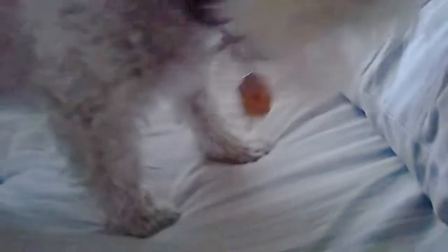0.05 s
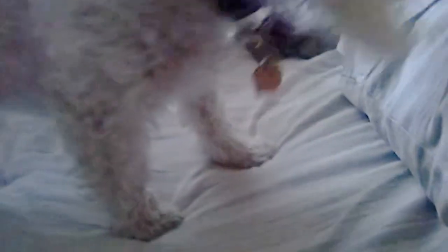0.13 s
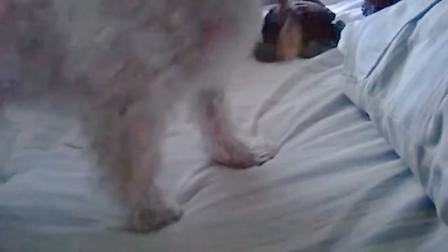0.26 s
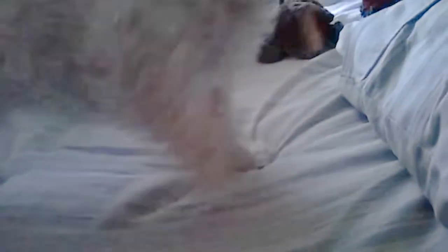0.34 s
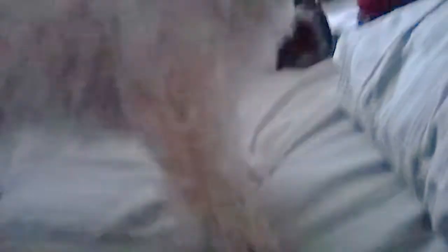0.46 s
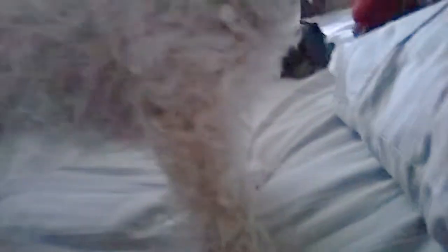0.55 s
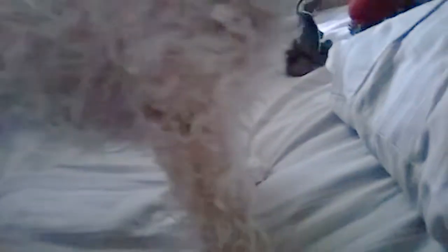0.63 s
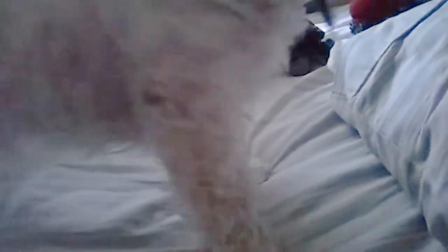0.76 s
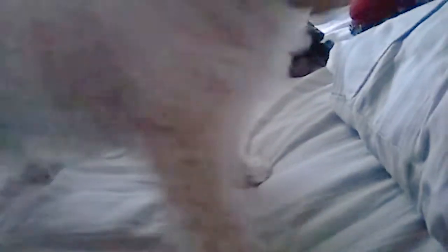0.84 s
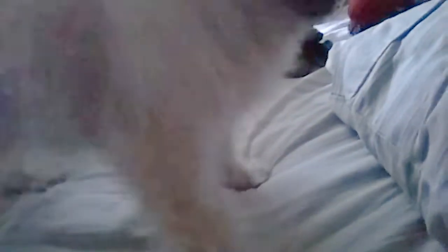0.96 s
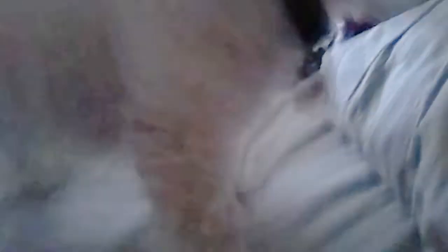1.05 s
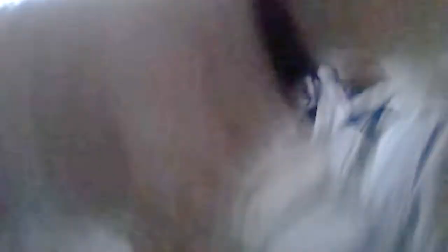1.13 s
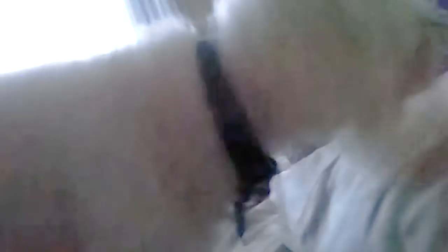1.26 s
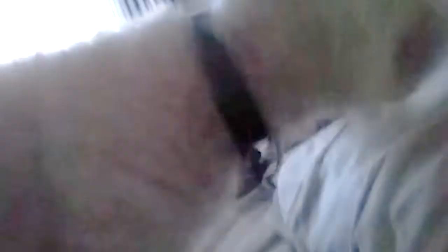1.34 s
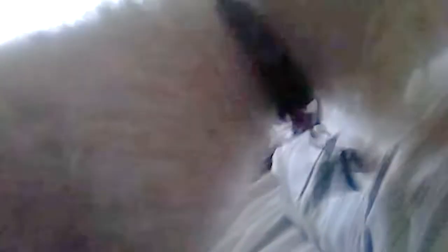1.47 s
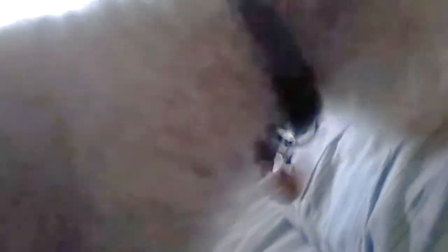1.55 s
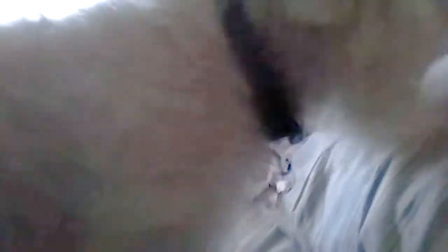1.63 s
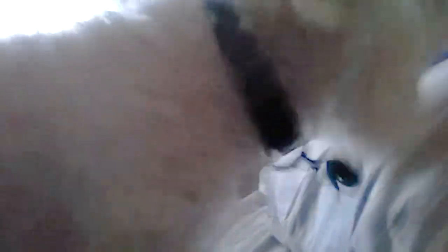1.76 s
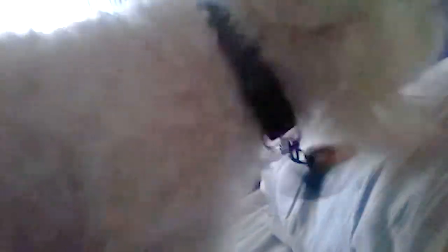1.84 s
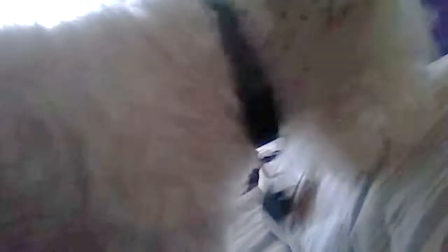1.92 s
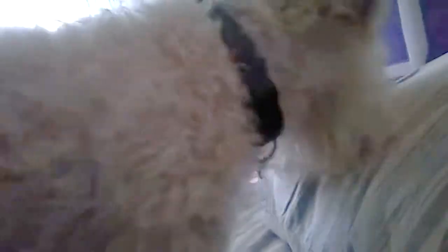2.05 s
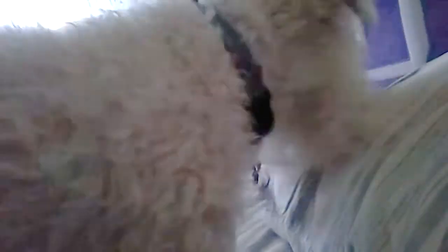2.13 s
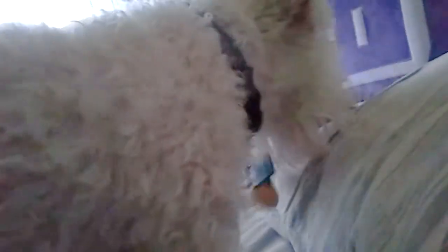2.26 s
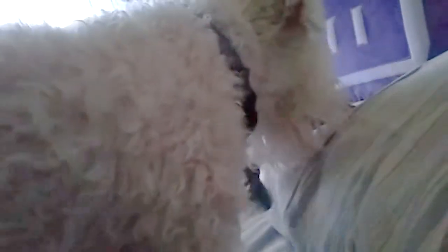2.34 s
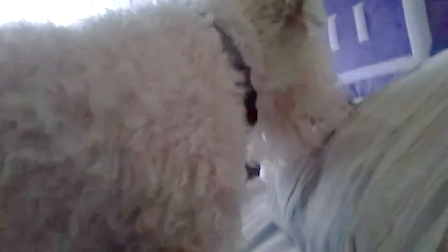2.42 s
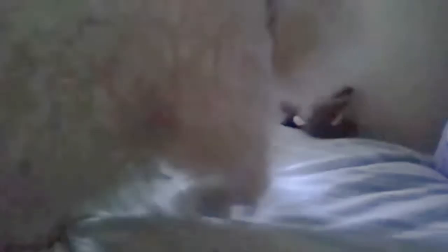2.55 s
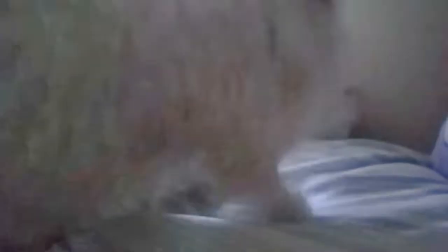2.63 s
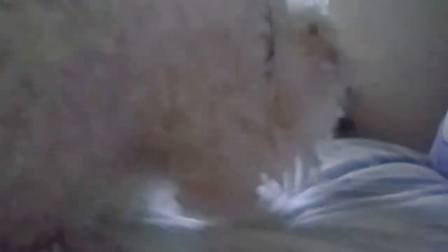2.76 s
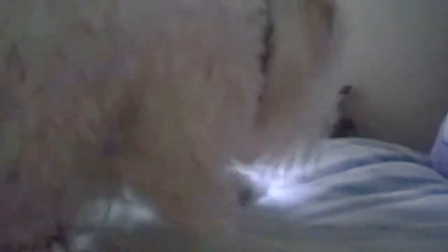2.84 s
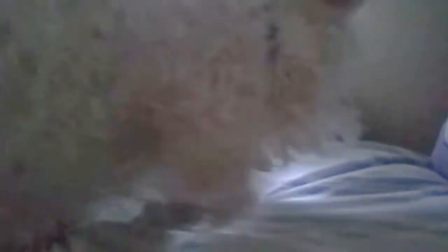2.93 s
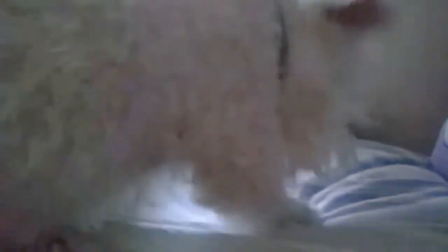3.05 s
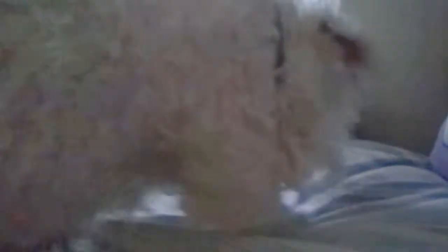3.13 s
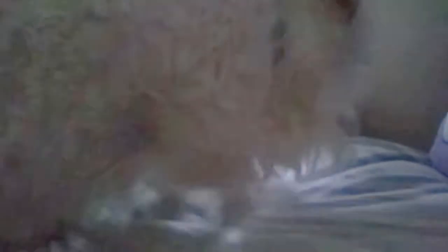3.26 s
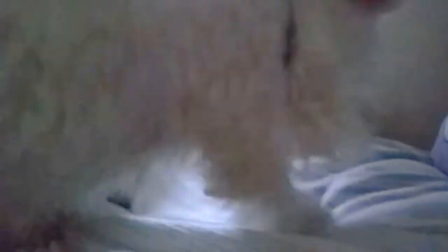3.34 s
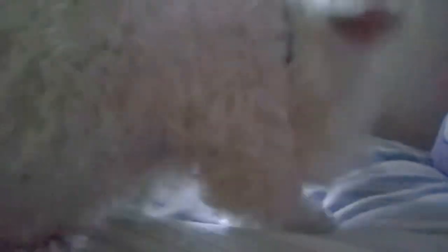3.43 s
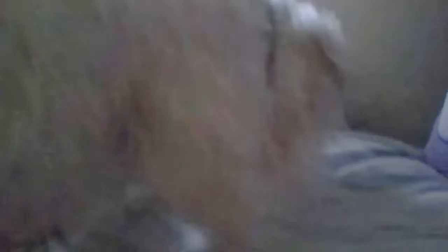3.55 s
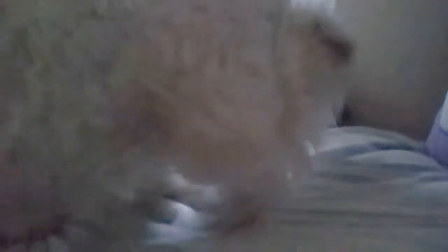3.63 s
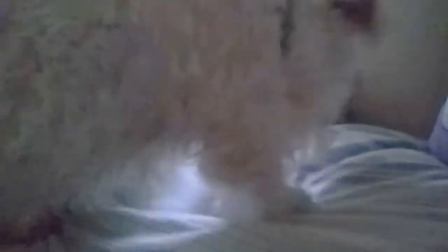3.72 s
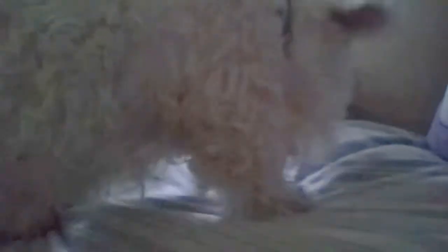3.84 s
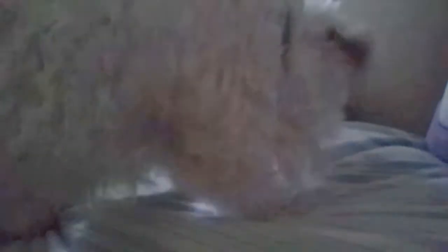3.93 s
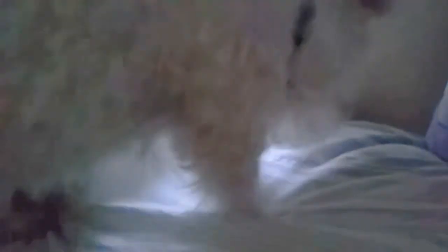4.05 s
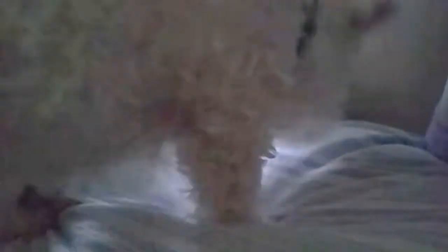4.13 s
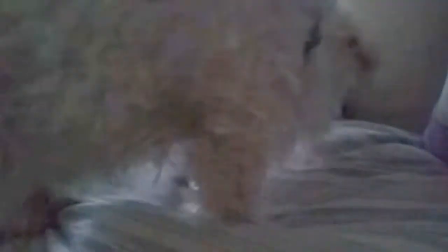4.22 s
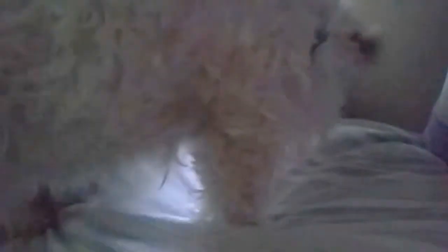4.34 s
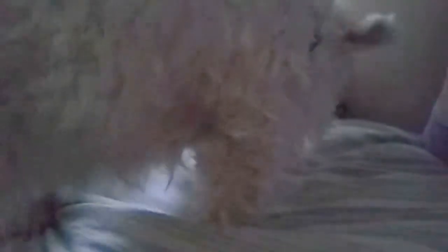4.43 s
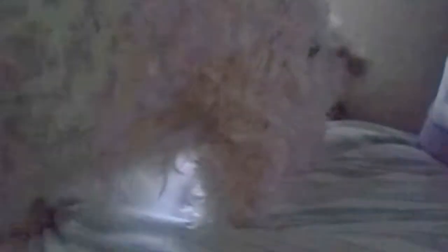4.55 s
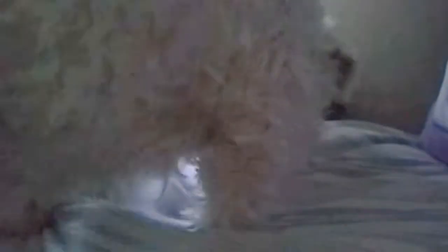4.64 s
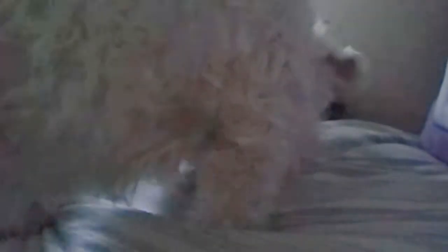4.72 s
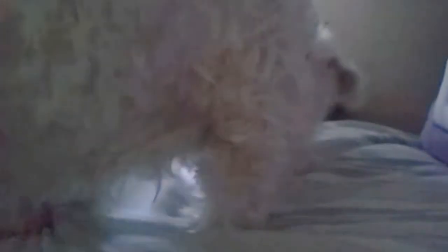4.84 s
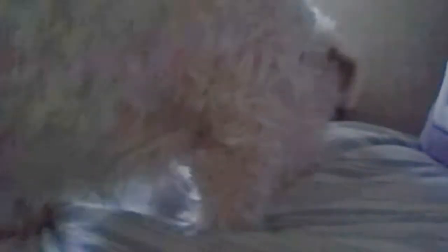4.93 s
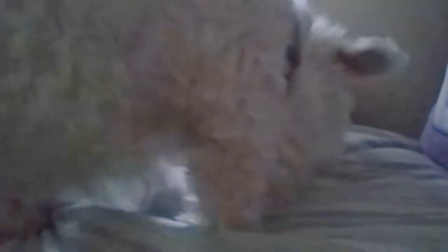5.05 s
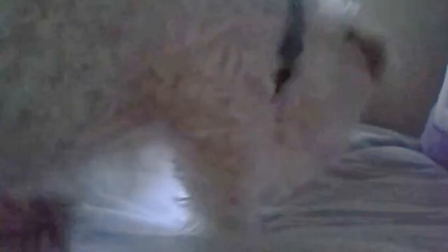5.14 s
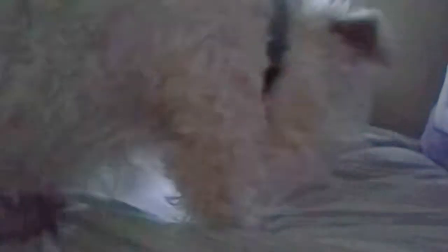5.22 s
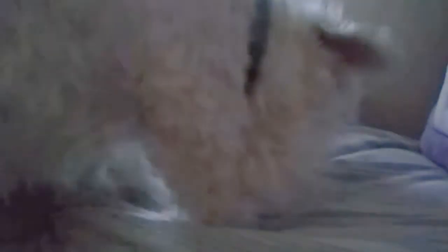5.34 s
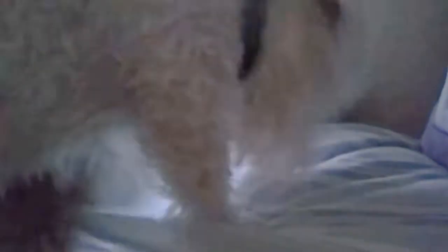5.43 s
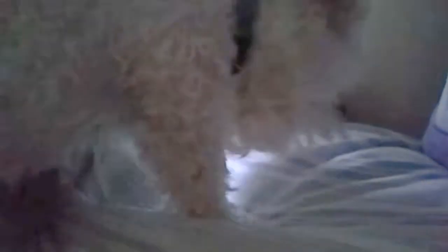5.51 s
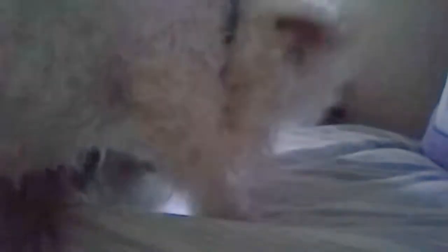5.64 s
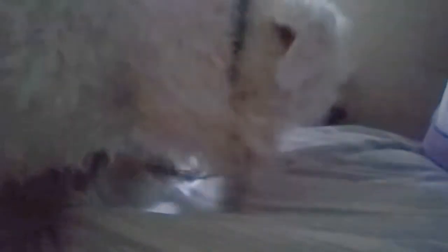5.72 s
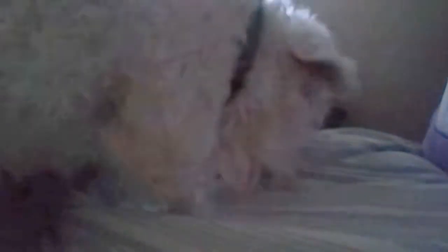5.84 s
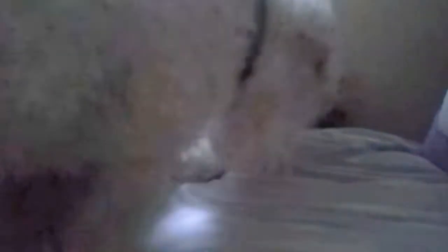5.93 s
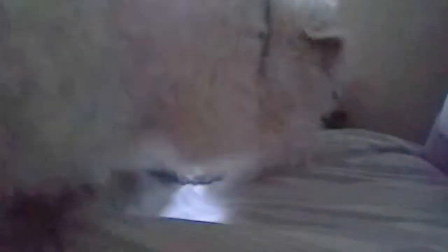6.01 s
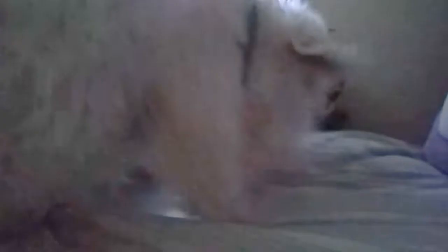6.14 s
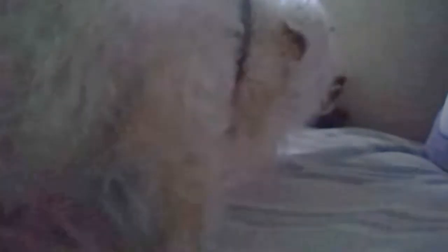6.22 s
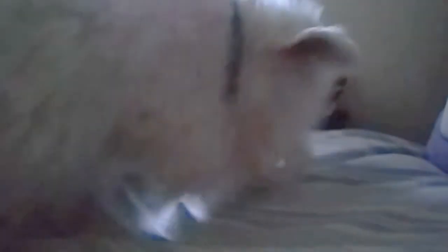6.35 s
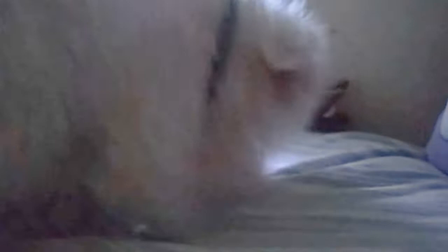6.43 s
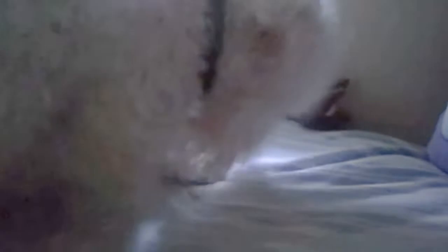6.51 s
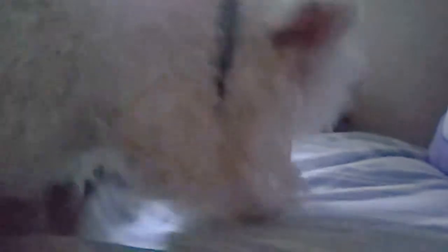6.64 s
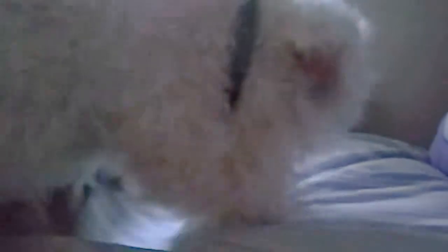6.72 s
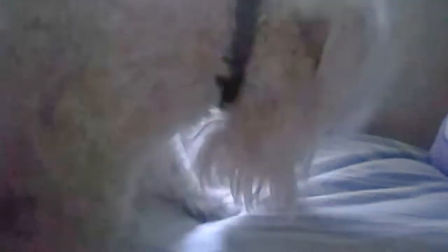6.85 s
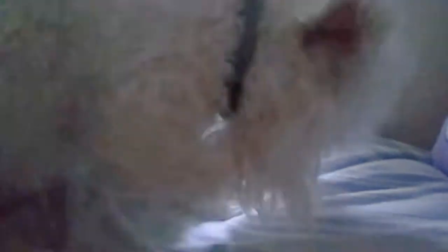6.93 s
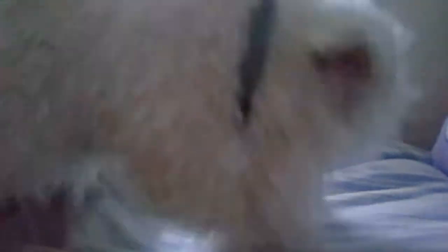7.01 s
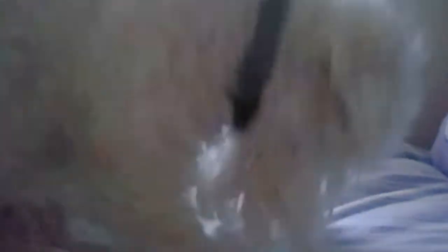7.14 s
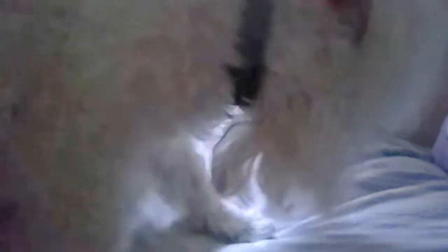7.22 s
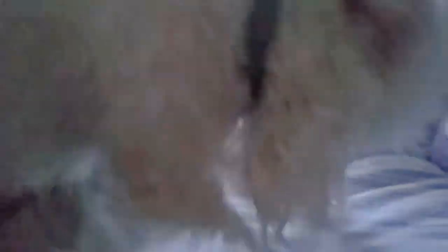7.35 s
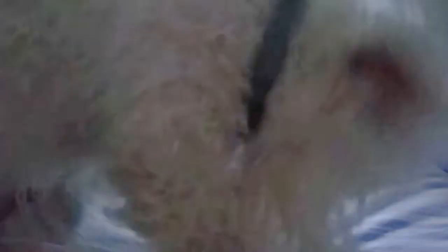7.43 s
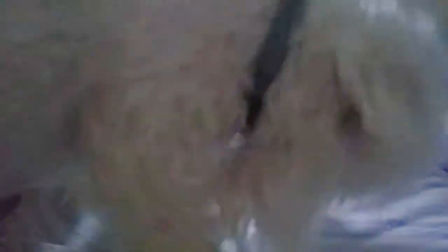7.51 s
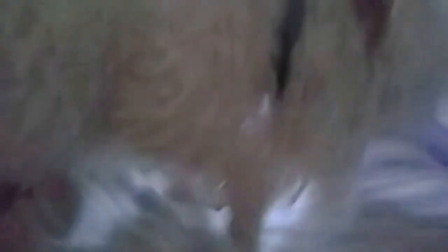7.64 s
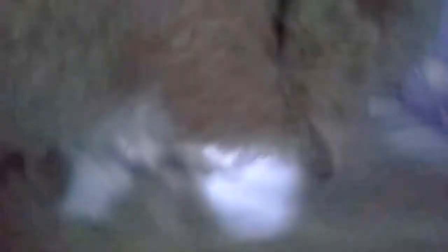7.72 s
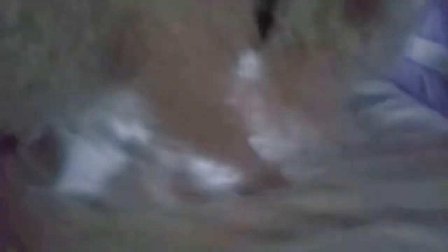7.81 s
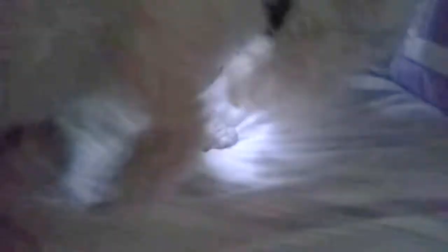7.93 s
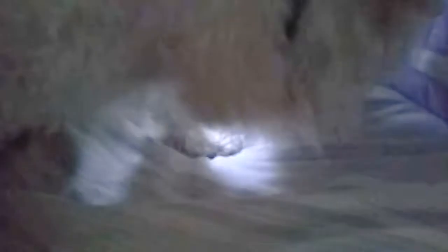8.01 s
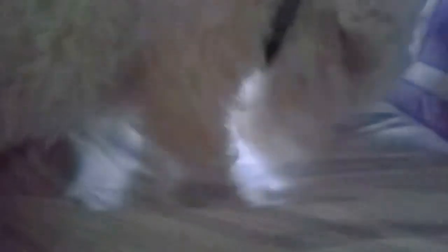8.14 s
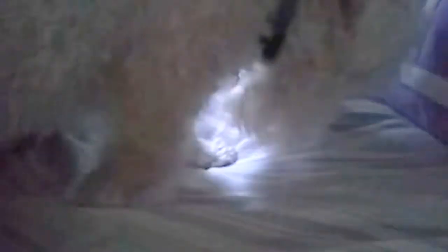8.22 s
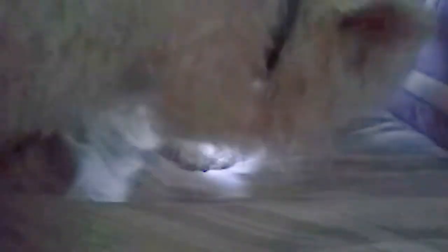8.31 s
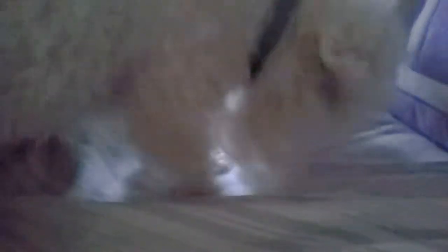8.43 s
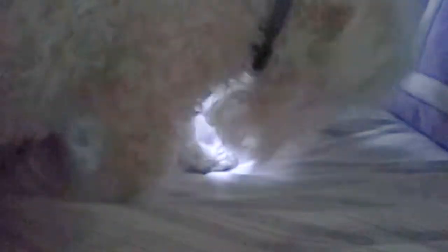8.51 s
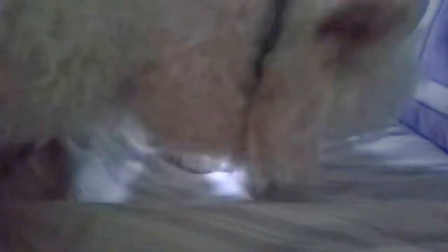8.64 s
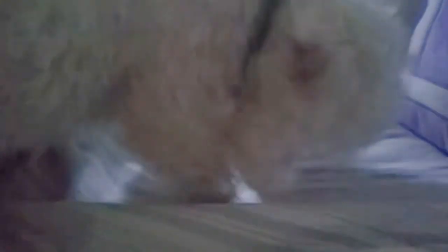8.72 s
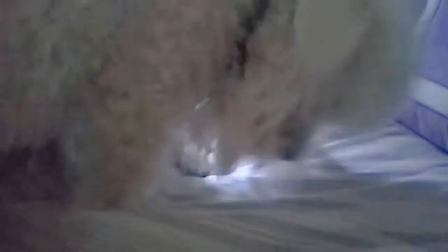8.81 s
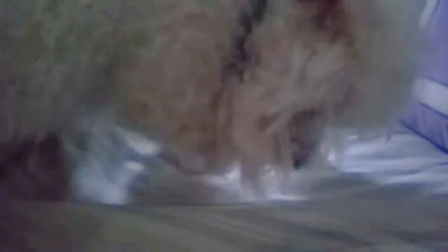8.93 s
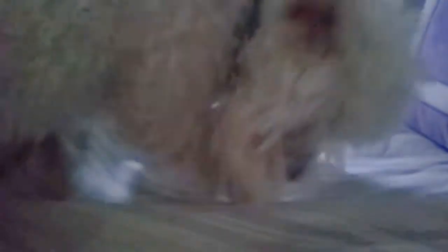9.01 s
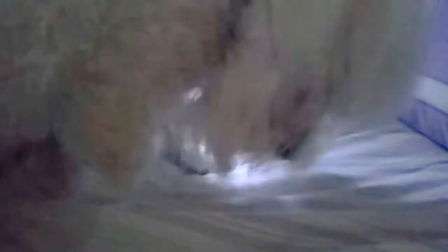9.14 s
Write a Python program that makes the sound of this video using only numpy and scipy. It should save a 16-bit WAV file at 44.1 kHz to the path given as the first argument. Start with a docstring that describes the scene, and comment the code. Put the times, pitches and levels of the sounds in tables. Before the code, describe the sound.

Indoors on a bed, very close to the microphone, a small curly-haired dog shakes its neck: a dense, bright jingle of metal tags with buckle knocks and rustling fur, thinning out by two seconds. Then it digs at the sheet in separate short scratches, three or four a second, each a dry cloth rasp with claw snags, a fine hiss and a dull mattress thump. Low bed rumble and faint hiss lie underneath.

```python
"""A small dog on a bed, close to the microphone, over a quiet hiss and the low rumble of the swaying bed.
First it shakes its neck: fur rustles, the collar buckle knocks, and metal tags ring as decaying sine pairs.
From about 2.5 s it digs at the sheet, some five strokes a second: claws rasp as noise in the resonances of
the taut cloth, snag it as damped tones and zip over the weave as rising tones; fur and fabric hiss as
shaped noise, and each stroke thumps the mattress with short low tones."""
import sys
import numpy as np
from scipy.fft import rfft, irfft, next_fast_len
from scipy.io import wavfile
from scipy.ndimage import uniform_filter1d, map_coordinates

SR = 44100
rng = np.random.default_rng(int(sys.argv[2]) if len(sys.argv) > 2 else 0)


def file_out(sig):
    """Save sig as 16-bit WAV at sys.argv[1]."""
    # one column per channel
    cols = np.atleast_2d(sig).T
    # limit, then scale
    lim = np.clip(cols, -1, 1)
    pcm = np.round(lim * 32767).astype(np.int16)
    wavfile.write(sys.argv[1], SR, pcm)


N = 404397

# Spectra of the noises: (frequency [Hz], relative density [dB per Hz])
FLOOR_SPECTRUM = [(41, -29.5), (70, -4.5), (155, -7), (307, -15.5), (853, -25), (1850, -26.5), (1980, -28),
                  (5500, -28.5), (11400, -22.5), (16000, -35)]
SWAY_SPECTRUM = [(8, -18), (16, -3), (28, 0), (45, -3), (70, -22)]
MATTRESS_SPECTRUM = [(35, -30.5), (55, 4), (80, 0.5), (130, -2), (180, -8), (260, -14.5), (400, -27)]
RUSTLE_SPECTRUM = [(150, -10), (350, 4.5), (700, -4), (1500, -12.5), (2500, -11), (3200, -9), (5000, -8.5),
                   (7000, -28)]
CRACK_SPECTRUM = [(800, -42), (3000, -31), (5000, -21.5), (8000, -10), (10000, -3), (12000, 3), (14000, 2),
                  (16500, -8.5)]
HISS_SPECTRUM = [(2240, -6), (3800, -11), (6150, -11.5), (8560, -10), (10300, -8.5), (11000, -2),
                 (12100, 0.5), (15000, -10.5), (16000, -10.5)]
# Sway of the bed: (time [s], level [dB])
BED_SWAY = [(0.0, -47), (0.07, -37), (0.3, -50), (0.92, -32), (1.66, -34), (1.81, -48.5), (2.4, -55),
            (2.55, -28), (3.98, -32.5), (4.52, -37), (4.54, -30.5), (6.0, -34), (6.05, -43.5),
            (6.31, -22.5), (6.33, -30.5), (7.12, -32.5), (7.3, -36.5), (8.91, -36), (8.96, -30.5),
            (9.17, -34.5)]
# Neck shake: (time [s], loose rattle of the tag rings [dB], mattress [dB])
SHAKE = [(0.0, -84, -79), (0.2, -68, -59), (0.3, -77, -81), (0.47, -67.5, -69), (0.57, -52, -45),
         (0.68, -52.5, -57), (0.79, -55.5, -52), (0.97, -42, -47), (1.08, -45.5, -36), (1.17, -59, -54),
         (1.49, -54, -45.5), (1.67, -57.5, -56), (1.83, -76, -76), (2.1, -87, -62.5), (2.47, -79, -61)]
# Clear knocks of the collar buckle: (time [s], level [dB], pitch [Hz])
KNOCKS = [(0.612, -45, 1530), (0.682, -42.5, 1660), (0.754, -37.5, 490), (0.827, -42, 791),
          (0.887, -30.5, 3010), (0.896, -24, 600), (0.965, -30.5, 527), (1.003, -39.5, 2280),
          (1.027, -34, 501), (1.061, -43, 615), (1.075, -44, 1500), (1.107, -39, 1100), (1.089, -35, 800),
          (1.132, -26.5, 1176), (1.641, -55, 1400), (2.134, -57.5, 1423)]
# Clear tag contacts: (time [s], crack [dB], low tag [dB], middle tag [dB], high tag [dB])
TAG_CONTACTS = [(0.4986, -43, -54, -39, -48), (0.541, -43, -61, -34, -34), (0.5503, -43, -41, -27, -37),
                (0.5696, -27, -29, -29, -27), (0.5777, -38, -44, -35, -24), (0.5883, -18, -49, -28, -35),
                (0.5951, -24, -50, -29, -25), (0.6115, -33, -43, -29, -32), (0.6286, -40, -47, -24, -28),
                (0.6422, -42, -38, -18, -24), (0.6657, -27, -57, -28, -37), (0.6898, -32, -65, -22, -26),
                (0.6956, -29, -49, -29, -35), (0.7071, -33, -45, -22, -28), (0.7236, -24, -29, -29, -29),
                (0.7377, -34, -40, -24, -28), (0.7515, -22, -40, -18, -22), (0.786, -31, -51, -29, -22),
                (0.796, -25, -44, -28, -19), (0.8198, -24, -54, -29, -33), (0.8405, -27, -42, -31, -30),
                (0.8627, -25, -52, -27, -19), (0.871, -36, -48, -21, -34), (0.8887, -28, -49, -32, -33),
                (0.8975, -33, -52, -33, -37), (0.9344, -20, -42, -36, -29), (0.9466, -20, -43, -39, -34),
                (0.9525, -28, -52, -32, -38), (0.971, -32, -51, -32, -22), (1.0073, -23, -42, -22, -32),
                (1.0167, -26, -42, -43, -43), (1.0211, -19, -30.5, -20, -33), (1.0277, -27, -39, -19, -26),
                (1.0453, -32, -46, -26, -28), (1.0744, -32, -48, -35, -37), (1.0879, -36, -50, -16, -31),
                (1.1128, -20, -61, -35, -38), (1.1324, -19, -49, -9, -29), (1.1661, -43, -52, -34, -36),
                (1.1971, -35, -59, -41, -49), (1.2277, -35, -49, -21, -36), (1.2694, -35.5, -49, -38, -39),
                (1.3192, -35, -61, -49, -44), (1.3302, -29, -61, -33, -37), (1.3472, -31, -43, -31.5, -27),
                (1.3661, -43, -53, -34, -33.5), (1.3707, -26, -49, -37, -40), (1.4046, -34, -50, -34, -30),
                (1.4425, -39, -67, -34, -47), (1.4539, -30, -50, -35, -27), (1.4958, -39, -64, -38, -38),
                (1.5367, -36, -34, -22, -20), (1.5527, -26, -46, -28, -25), (1.6006, -38, -61, -48, -30),
                (1.6373, -25, -62, -43, -43), (1.642, -28, -31, -37, -19), (1.663, -38, -42, -39.5, -30),
                (1.6987, -44, -62, -38, -38), (1.7229, -30, -61, -31, -34), (1.8378, -40, -48, -42, -36),
                (1.8513, -41, -53, -49, -42), (1.8578, -36, -54, -37, -36), (1.8745, -49, -62, -39, -43),
                (1.932, -48, -64, -51, -40), (1.9888, -55, -74, -72, -65), (2.1004, -49, -61, -53, -46),
                (2.1349, -53, -61, -55, -42.5), (2.3441, -32, -66, -38, -39), (2.4949, -47, -66, -47, -46),
                (6.8993, -37.5, -66, -45, -44)]
# Modes of the low, middle and high tag, one list each:
# (frequency [Hz], level [dB], twin frequency [Hz], least twin level [dB], decay by 60 dB [s])
TAG_MODES = [
    [(6350, 0, 6050, -9, 0.06)],
    [(11866, -0.5, 11760, -18, 0.1), (7080, -34, 6720, 2, 0.45)],
    [(14760, -1.2, 14770, 4.5, 0.061)],
]
# Dry ticks of the collar rings during the digging: (time [s], level [dB])
RING_TICKS = [(6.6204, -31), (6.7107, -31), (6.727, -45), (7.07, -36), (7.0828, -42), (8.095, -45)]
# Digging strokes: (start [s], length [s], lower rasp [dB], hiss [dB], upper rasp against lower [dB],
# swell over the stroke [dB], landing thump [dB], push-off after the start [ms], push-off thump [dB],
# push-off pitch [Hz])
STROKES = [(2.483, 0.008, -52.5, -54.5, -13, -2, -51, 5.6, -31.5, 87.5),
           (2.52, 0.11, -42, -45.5, 0, 5, -26.5, 106, -26, 116),
           (2.697, 0.077, -46.5, -48, 3, -0.5, -27, 82, -29.5, 100.5),
           (2.9, 0.077, -43, -46.5, 0.5, 5.5, -27, 112, -24.5, 75),
           (3.025, 0.057, -47.5, -47.5, 6, -0.5, -26.5, 33, -31, 117),
           (3.269, 0.067, -40.5, -47, 4, 5, -25, 67, -22, 98),
           (3.4, 0.11, -47.5, -49.5, 3.5, 2.5, -31, 108, -26, 97),
           (3.753, 0.057, -44, -44, 4, -1, -27, 23, -27.5, 109),
           (4.039, 0.034, -40, -45.5, 2.5, 3, -24, 19.2, -15.5, 105.3),
           (4.305, 0.028, -37, -43.5, 2.5, 8, -28, 33, -20, 108.5),
           (4.571, 0.053, -42, -47.5, 3, 4.5, -21, 42, -30, 80),
           (4.841, 0.078, -39, -44.5, 3.5, 3.5, -22.5, 77, -19.5, 111),
           (5.114, 0.088, -44.5, -48.5, 4.5, 6.5, -26.5, 97, -26, 96),
           (5.375, 0.017, -73, -64, -10, -10, -47, 9.3, -28.5, 77),
           (5.628, 0.081, -42, -44, 3, 3, -32, 82, -21.5, 68),
           (5.9, 0.094, -44, -45.5, 3, 5.5, -27.5, 98, -26, 116),
           (6.193, 0.096, -41, -44, 4, 5.5, -37, 84, -17, 76.5),
           (6.42, 0.1, -51, -51.5, 3, 2, -31.5, 70, -32, 71.6),
           (6.575, 0.083, -42, -43, 4, 6, -55, 86, -13.5, 83),
           (6.802, 0.027, -52.5, -55, 2.5, 1, -40, 40, -33, 69.5),
           (6.937, 0.096, -38, -43, 0.5, 5.5, -47, 90, -18, 91.9),
           (7.127, 0.066, -47, -48.5, 4.5, -2, -41, 39, -22.5, 92.5),
           (7.291, 0.072, -45, -47.5, -0.5, 5, -34, 79, -29, 137.5),
           (7.651, 0.068, -38.5, -43.5, 1, 1, -28.5, 80, -24, 75.5),
           (7.863, 0.0064, -58.5, -59, 1, 2.5, -44, 12, -42, 149),
           (7.944, 0.089, -38.5, -45, 0.5, 3.5, -35, 108, -24, 91),
           (8.176, 0.0065, -56.5, -62, 0, -5, -47, 2, -50, 74.6),
           (8.231, 0.099, -43, -46, 3.5, 5, -34, 119, -21.5, 77.4),
           (8.445, 0.021, -55, -60, -2, 4, -48, 41, -41, 56.4),
           (8.57, 0.061, -39, -46, -1, 1.5, -30, 75, -23, 93),
           (8.76, 0.012, -57, -63, -9, 3, -53, 16, -45, 76),
           (8.855, 0.087, -41.5, -48, 0, 4.5, -39, 98, -25.5, 124),
           (9.097, 0.064, -61, -60, -6, 0, -42, 41, -40, 73)]
# Claw snags: (time [s], level [dB], pitch [Hz])
SNAGS = [(2.485, -50, 750), (2.535, -25.5, 1910), (2.971, -30, 690), (3.291, -25.5, 840),
         (3.327, -28.5, 670), (3.773, -29, 850), (4.047, -21, 844), (4.294, -37, 2080), (4.321, -20.5, 634),
         (4.58, -27, 640), (5.629, -27, 2040), (5.709, -32, 1200), (6.658, -17, 1920), (7.063, -35, 1750),
         (7.664, -29, 1560), (7.715, -27, 2260), (7.862, -47, 864), (7.973, -23.5, 880), (8.166, -43, 2070),
         (8.446, -52, 800), (8.571, -21.5, 794), (8.583, -17, 1920), (8.754, -43, 1900), (8.837, -37, 1550),
         (8.925, -18, 1890), (8.932, -16.5, 2040)]
# Resonances of the taut cloth: (centre [Hz], width of one filter pass [Hz], level [dB])
SHEET_MODES = [(472, 360, -3), (780, 515, -4.5), (1456, 580, -7), (1975, 570, -3.5), (2480, 1270, -15.5),
               (3230, 790, -11)]
# A claw zips over the weave, faster and faster: (time [s], length [s], first pitch [Hz], last pitch [Hz],
# level [dB])
ZIPS = [(5.663, 0.027, 2220, 3020, -38), (5.909, 0.058, 2350, 3500, -33.5), (6.186, 0.027, 2430, 3090, -31),
        (6.231, 0.031, 1795, 3600, -40.5), (7.125, 0.093, 1090, 1880, -37), (8.218, 0.038, 357, 796, -42),
        (8.246, 0.051, 770, 810, -27.5), (8.768, .018, 1710, 2240, -37.5)]

FLOOR_DB = -66.5
EDGE_HZ, TOP_HZ = 15800, 16774
STILL_DB = -68  # below this rattle no small knock or tick occurs
RUSTLE_UNDER_RATTLE_DB = -9
SMALL_KNOCKS_PER_S, SMALL_KNOCK_DB, SMALL_KNOCK_HZ = 70, -4, 610  # least dB over the rattle; lowest pitch
TICKS_PER_S, TICK_DB, TICK_SPREAD_DB = 160, 10, 12  # small contacts of the rings, over their rattle
DIG_FROM_S = 2.48
RISE_DB_PER_S, FALL_DB_PER_S = 498, 569  # a stroke bites and lets go
LINGER_DB, LINGER_DB_PER_S = -21.5, 107  # the cloth slides back afterwards
REST_RASP_DB, REST_HISS_DB, REST_MATTRESS_DB = -62, -59, -49  # shuffling between strokes
SAG_RASP_DB, SAG_MATTRESS_DB = -3, -6.5  # mid-stroke, low rasp and mattress...
SAG_HISS_DB = -1  # ...and hiss are weighted by these
HISS_SWELL_DB = 1.5  # the hiss gathers towards the end of a stroke
TOP_TILT = 1.57  # the highest cloth resonances follow the upper rasp more strongly
SMALL_SNAGS_PER_S, SMALL_SNAG_DB, SMALL_SNAG_HZ = 60, -1, 552  # dB over the rasp; lowest pitch
MATTRESS_OVER_RASP_DB, MATTRESS_LAG_S = 8.5, 0.0089
LAND_AFTER_S, LAND_HZ, LAND_SCATTER = 0.01492, 116.8, 0.17  # scatter in octaves
REBOUND_S, REBOUND_DB, REBOUND_PITCH = 0.02974, -5, 0.512  # the mattress springs back after a push


def amp(db):
    """Decibels are logarithmic: 20 dB is a factor of ten in amplitude."""
    return 10 ** (np.asarray(db) / 20)


def unit(x):
    """Normalisation by the root mean square gives noise a unit level."""
    return x / np.sqrt(np.mean(x ** 2) + 1e-20)


def curves(rows):
    """Linear interpolation in dB gives each column one value per sample, -120 dB outside its times."""
    s, *columns = np.transpose(rows)
    return [np.interp(np.arange(N) / SR, s, c, left=-120, right=-120) for c in columns]


def wobble(rate):
    """Spline interpolation of random knots, rate a second, yields a smooth fluctuation."""
    knots = rng.standard_normal(int(N * rate / SR) + 4)
    return map_coordinates(knots, [np.arange(N) * rate / SR])


def filtered(x, response):
    """A linear filter multiplies the spectrum by its complex response."""
    m = next_fast_len(N + SR // 2)
    return irfft(rfft(x, m) * response(np.fft.rfftfreq(m, 1 / SR)), m)[:N]


def colour(points):
    """Spectral shaping: gain is interpolated in dB over the logarithm of frequency."""
    f, db = np.transpose(points)
    return lambda hz: amp(np.interp(np.log(hz + 1), np.log(f + 1), db, left=-120, right=-120))


def grainy(depth_db, rate):
    """Stick-slip of fibres: noise is modulated irregularly by rate random knots a second."""
    return rng.standard_normal(N) * amp(depth_db * wobble(rate))


def add(track, s, sound):
    """Superposition: a short sound is summed into the track from s seconds."""
    part = track[max(round(s * SR), 0):][:len(sound)]
    part += sound[:len(part)]


def jolts(rate, level_db, still_db):
    """A random point process, thinned where the level is low: (time [s], level [dB], two draws 0-1)."""
    when, a, b = rng.uniform(0, 1, (round(rate * N / SR), 3)).T
    db = level_db[(when * N).astype(int)]
    return np.array([when * N / SR, db, a, b])[:, db > still_db]


def clicks(rows, t60, noisy, overtone):
    """Impact excites a damped mode: a tone and an overtone decay with a softened puff of noise."""
    out, t = np.zeros(N), np.arange(SR // 20) / SR
    for s, db, hz in rows:
        puff = np.convolve(rng.standard_normal(len(t)), np.hanning(9) / 2, "same")
        hit = np.sin(2 * np.pi * hz * t)
        hit += overtone * np.sin(2 * np.pi * 1.4 * hz * t)
        hit += noisy * puff * amp(-60 * t / 0.015)
        onset = 1 - np.exp(-t / 0.00032)
        add(out, s, amp(db - 2.0 - 60 * t / t60) * onset * hit)
    return out


def strokes(levels_db, rest_db, lag=0, more_swell_db=0, middle_db=0):
    """Friction follows the stroke: level [dB] rises, swells, falls and lingers over a steady shuffle."""
    start, length = np.transpose(STROKES)[:2, :, None]
    swell_db = np.transpose(STROKES)[5, :, None] + more_swell_db
    t = np.arange(0, N / SR, .002) - lag
    early = np.maximum(start - t, 0)
    late = np.maximum(t - start - length, 0)
    along = np.clip((t - start) / length, 0, 1)
    held_db = swell_db * (along - .5) + middle_db * (np.sin(np.pi * along) - .5)
    held_db = held_db - RISE_DB_PER_S * early
    release = amp(-FALL_DB_PER_S * late) + (late > 0) * amp(LINGER_DB - LINGER_DB_PER_S * late)
    each = amp(levels_db)[:, None] * amp(held_db) * release
    # independent noises add in power
    total = np.hypot(np.linalg.norm(each, axis=0), amp(rest_db)) * (t > DIG_FROM_S)
    return np.interp(np.arange(N) / SR, t + lag, 20 * np.log10(total + 1e-6))


def room():
    """Stationary noise: the quiet hiss of room and microphone has a fixed spectrum."""
    return amp(FLOOR_DB) * unit(filtered(rng.standard_normal(N), colour(FLOOR_SPECTRUM)))


def bed():
    """A sprung mass: sway and lumpy mattress noise are low-passed, and each push or landing thumps."""
    start, _, rasp_db, _, _, _, land_db, push_ms, push_db, push_hz = np.transpose(STROKES)
    push = start + push_ms / 1000
    dug_db = strokes(rasp_db + MATTRESS_OVER_RASP_DB, REST_MATTRESS_DB, MATTRESS_LAG_S,
                     middle_db=SAG_MATTRESS_DB)
    mattress_db = np.maximum(curves(SHAKE)[1], dug_db)
    lumps = amp(1.97 * wobble(18)) * filtered(rng.standard_normal(N), colour(MATTRESS_SPECTRUM))
    out = amp(mattress_db - 3.5) * unit(lumps)

    # the sway strengthens slightly with the mattress noise
    sway_db = curves(BED_SWAY)[0] + 0.21 * np.clip(mattress_db + 37.5, -20, 20) - 0.16
    sway = amp(2.17 * wobble(11)) * filtered(rng.standard_normal(N), colour(SWAY_SPECTRUM))
    out += amp(sway_db) * unit(sway)

    t, rise = np.arange(SR // 8) / SR, .009
    swell = t / rise * np.exp(1 - t / rise)  # peaks at the rise time
    bend, *phases = rng.standard_normal((len(start), 4)).T
    land_hz = LAND_HZ * 2 ** (LAND_SCATTER * bend)
    thumps = [(start + LAND_AFTER_S, land_db, land_hz),
              (push, push_db, push_hz),
              (push + REBOUND_S, push_db + REBOUND_DB, push_hz * REBOUND_PITCH)]
    for kind, turns in zip(thumps, phases):
        for s, db, hz, phase in zip(*kind, turns):
            cycles = np.cos(2 * np.pi * hz * (t - rise) + 0.63 * phase)
            add(out, s - rise, amp(db - 2.8) * swell * cycles)
    return out


def shake():
    """Friction and impact: fur rustles as shaped noise and the buckle knocks as the neck swings."""
    rattle_db = curves(SHAKE)[0]
    fur = unit(filtered(grainy(4, rate=74), colour(RUSTLE_SPECTRUM)))
    fur = amp(rattle_db + RUSTLE_UNDER_RATTLE_DB) * fur
    s, db, size, pitch = jolts(SMALL_KNOCKS_PER_S, rattle_db, STILL_DB)
    small = zip(s, db + SMALL_KNOCK_DB + 12 * size, SMALL_KNOCK_HZ * 2 ** (3.1 * pitch))
    return fur + clicks(KNOCKS + list(small), t60=0.022, noisy=1.48, overtone=0.56)


def tags():
    """Modal ringing: each contact grips the tags, cuts off the old tones and excites them anew."""
    rows = np.array(TAG_CONTACTS)
    t = np.arange(N) / SR
    last = np.maximum(np.searchsorted(rows[:, 0], t, "right") - 1, 0)  # index of the latest contact
    age = np.maximum(t - rows[last, 0], 0)
    ring = np.zeros(N)
    for k, modes in enumerate(TAG_MODES):
        for hz, db, twin_hz, twin_db, t60 in modes:
            phase, twin_phase, tilt, grip = rng.uniform(0, 1, (len(rows), 4))[last].T
            held = age * (1 + .012 * (grip - .5))  # where the tag is held shifts its pitch a little
            twin = amp(twin_db + 20 * tilt)  # the twin beats against the tone
            pair = np.sin(2 * np.pi * (hz * held + phase))
            pair += twin * np.sin(2 * np.pi * (twin_hz * held + twin_phase))
            brush = amp(3.7 * wobble(90))  # fur brushes the swinging tags
            decay = amp(rows[last, 2 + k] + db + 3.5 - 60 * age / t60)
            ring += decay * brush * pair / np.sqrt(1 + twin ** 2)
    ring *= 1 - np.exp(-age / 0.0001)

    # each contact adds two short clinks at random high pitches
    clink_hz = 6800 * 2 ** (1.4 * rng.uniform(0, 1, (len(rows), 2)))[last].T
    clink = np.sin(2 * np.pi * clink_hz * age).sum(axis=0)
    ring += amp(rows[last, 1] - 15.5 - 60 * age / 0.0082) * clink

    # envelope of the cracks: a fast and a slow decay, then the ticks of the rings
    decays = amp(-60 * age / 0.0025) + amp(-4.5 - 60 * age / 0.045)
    cracks = amp(rows[last, 1] + 1.2) * decays * (age > 0)
    rattle_db = curves(SHAKE)[0]
    short = t[:SR // 50]
    for s, db, size, _ in zip(*jolts(TICKS_PER_S, rattle_db, STILL_DB)):
        add(cracks, s, amp(db + TICK_DB + TICK_SPREAD_DB * size ** 2 - 60 * short / .012))
    for s, db in RING_TICKS:
        add(cracks, s, amp(db - 60 * short / 0.0087))

    rattle = amp(rattle_db + 3.5) * unit(grainy(5.2, rate=210))
    sharp = rng.uniform(0, 1, len(rows))[last]  # edge-on contacts are bright, flat ones dull
    dull = unit(filtered(grainy(4.5, rate=320), lambda hz: 1 / (1 + (hz / 7500) ** 6)))
    grit = sharp * unit(grainy(4.5, rate=420)) + (1 - sharp) * 0.57 * dull
    bright = colour(CRACK_SPECTRUM)
    scale = np.std(filtered(rng.standard_normal(N), bright))  # gain of the filter on white noise
    return ring + filtered(cracks * grit + rattle, bright) / scale


def claws():
    """Resonance under friction: rasp noise drives the cloth's modes, snags pluck it and zips sweep up."""
    lower, _, upper = np.transpose(STROKES)[2:5]
    lower_db = strokes(lower, REST_RASP_DB, middle_db=SAG_RASP_DB)
    upper_db = strokes(lower + upper, REST_RASP_DB)
    s, db, size, pitch = jolts(SMALL_SNAGS_PER_S, lower_db, REST_RASP_DB + 8)
    small = zip(s, db + SMALL_SNAG_DB + 12 * size ** 2, SMALL_SNAG_HZ * 2 ** (2.4 * pitch))
    out = clicks(SNAGS + list(small), t60=0.019, noisy=0.16, overtone=0.15)

    press = amp(1.6 * wobble(70) + 3 * wobble(260))  # shared by all resonances
    for centre, width, db in SHEET_MODES:
        def resonance(f):
            """A driven resonator, passed twice, favours frequencies near its centre."""
            damping = 1j * f * width
            return (damping / (centre * centre - f * f + damping)) ** 2

        band = unit(filtered(grainy(0.88, rate=400), resonance))
        rasp_db = lower_db
        if centre > 1500:
            rasp_db = upper_db + (TOP_TILT - 1) * (centre > 2300) * (upper_db - lower_db)
        # each resonance also swells on its own
        out += amp(rasp_db + db - 5.0 + 3.13 * wobble(28)) * press * band

    for s, length, first_hz, last_hz, db in ZIPS:
        n = round(length * SR)
        jitter = 1 + 0.33 * uniform_filter1d(rng.standard_normal(n), size=40)
        hz = np.linspace(first_hz, last_hz, n) * jitter
        catch = amp(14 * uniform_filter1d(rng.standard_normal(n), size=30) - 7.5)  # threads grip unevenly
        tone = np.sin(2 * np.pi * np.cumsum(hz) / SR)
        add(out, s, amp(db) * catch * np.sqrt(np.hanning(n)) * tone)
    return out


def swish():
    """Sliding friction: fur and fabric give a fine, slightly fluttering hiss."""
    hiss_db = strokes(np.transpose(STROKES)[3], REST_HISS_DB,
                      more_swell_db=HISS_SWELL_DB, middle_db=SAG_HISS_DB)
    hiss = unit(filtered(grainy(1.27, rate=320), colour(HISS_SPECTRUM)))
    return amp(hiss_db + 1.2 * wobble(30)) * hiss


def scene():
    """Superposition: all sources add at one microphone lying on the bed."""
    return (room() + bed() + shake() + tags() + claws() + swish())[None]


def record(dry):
    """Saturation and band limiting: peaks are squeezed, the top treble drops, then nothing passes."""
    held = dry[0] / (1 + np.abs(dry[0] / .38) ** 6) ** (1 / 6)
    return filtered(held, lambda hz: np.where(hz < EDGE_HZ, 1, amp(-30)) * (hz < TOP_HZ))[None]


dry = scene()
out = record(dry)
file_out(out)
```